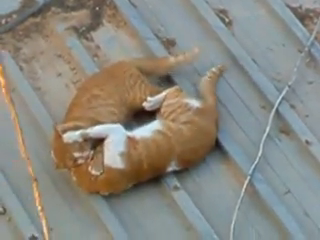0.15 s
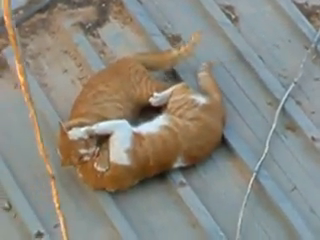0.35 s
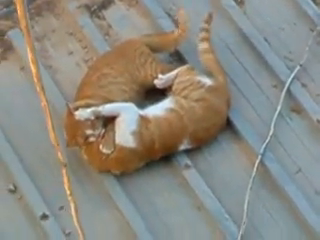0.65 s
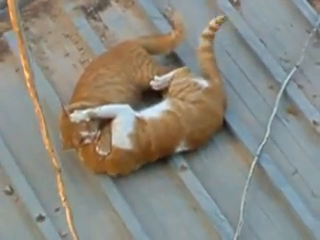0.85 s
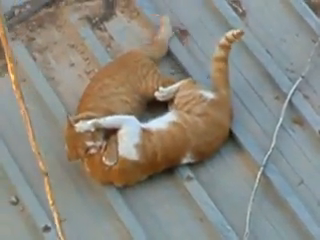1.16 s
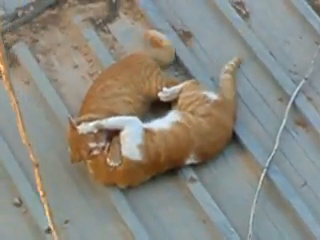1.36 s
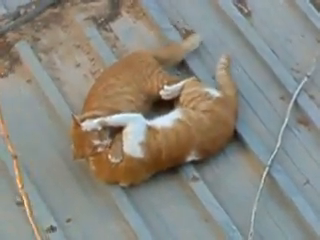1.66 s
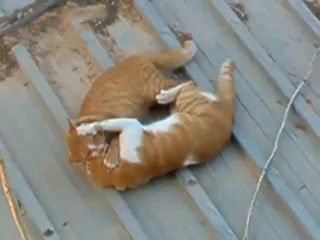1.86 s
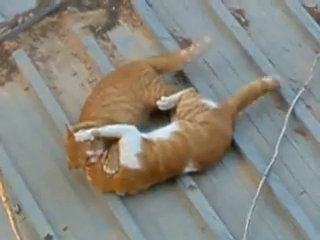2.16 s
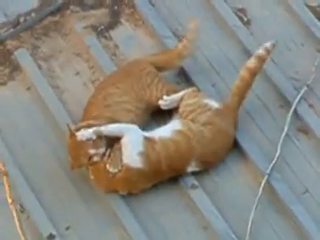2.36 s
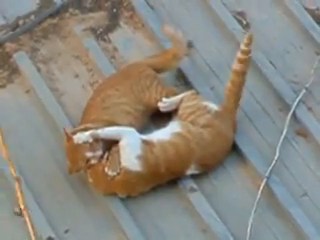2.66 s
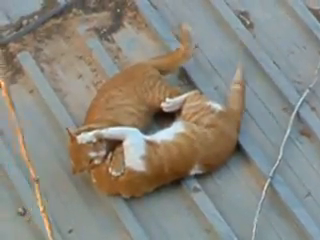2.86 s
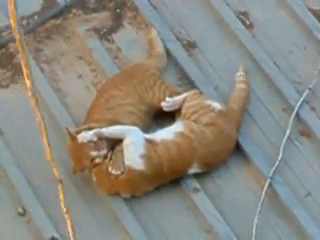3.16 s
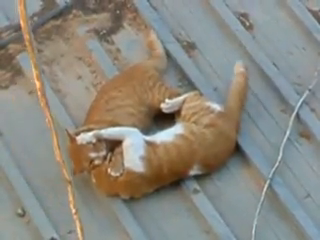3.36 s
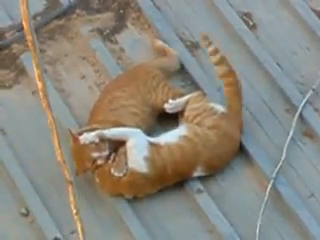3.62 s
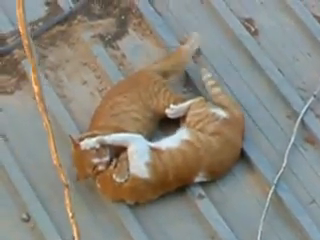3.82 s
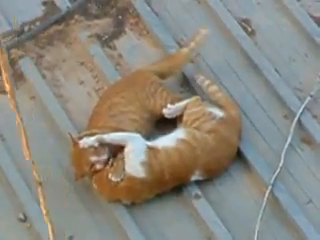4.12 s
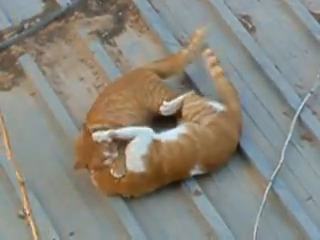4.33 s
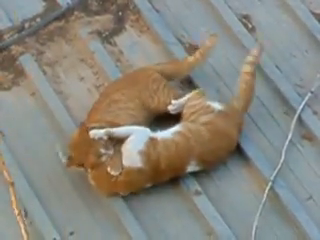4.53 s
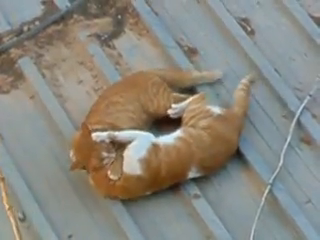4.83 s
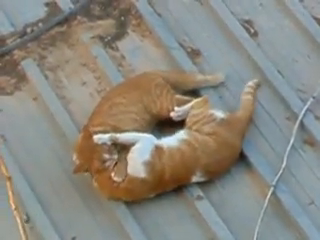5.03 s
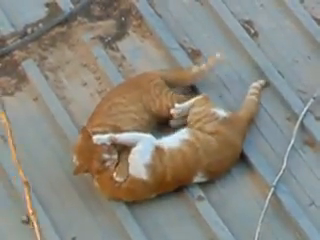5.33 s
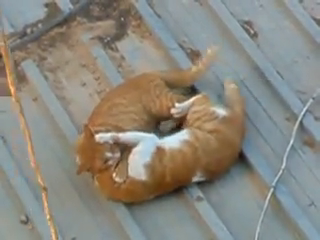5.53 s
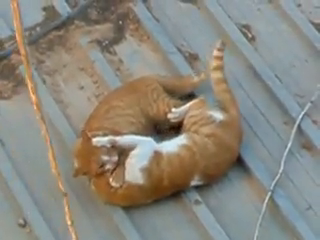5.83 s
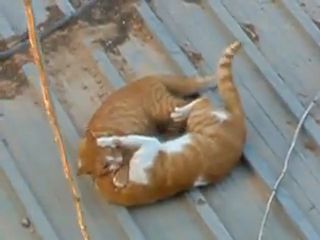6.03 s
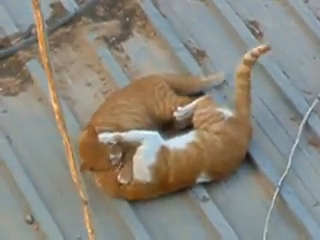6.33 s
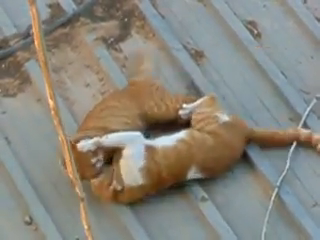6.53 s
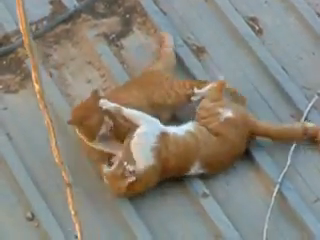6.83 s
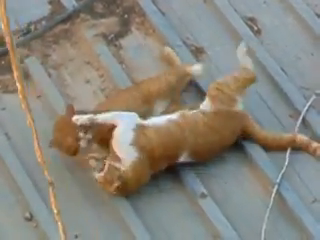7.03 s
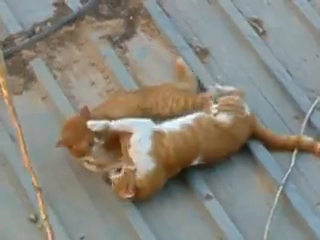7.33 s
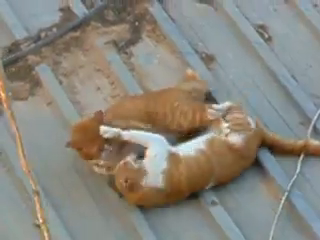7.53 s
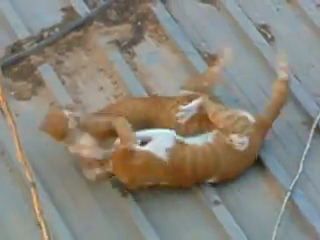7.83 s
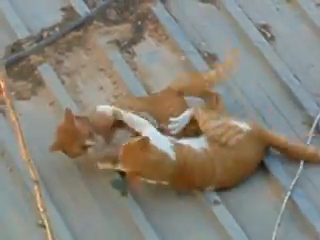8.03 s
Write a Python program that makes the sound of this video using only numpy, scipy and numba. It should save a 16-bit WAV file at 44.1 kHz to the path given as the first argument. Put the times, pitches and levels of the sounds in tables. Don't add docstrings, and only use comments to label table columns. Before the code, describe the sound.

Two fighting cats cry on a ribbed metal roof outdoors. Short wavering yowls rise and fall with pauses between, then one breaks into a harsh, loud scream. Rough growls and snarls follow, ending in a spit and a long piercing shriek that sags into hoarse moaning. Wind thumps the small microphone early on, street noise murmurs behind, and the loudest cries overload.

```python
import sys
import numpy as np
from scipy import signal
from scipy.fft import rfft, irfft, next_fast_len
from scipy.io import wavfile
from scipy.ndimage import uniform_filter1d, minimum_filter1d
from numba import njit

SR = 44100
rng = np.random.default_rng(int(sys.argv[2]) if len(sys.argv) > 2 else 0)


def generate_wav(signal):
    frames = np.transpose(np.atleast_2d(signal))
    scaled = np.clip(frames, -1, 1) * 32767
    pcm = np.round(scaled).astype(np.int16)
    wavfile.write(sys.argv[1], SR, pcm)


def gain_from_decibels(decibels):
    exponent = np.asarray(decibels, float) / 20
    return 10 ** exponent


N = 360738
TIME_S = np.arange(N) / SR
SWITCH_S = 0.03

# time_s, pitch_hz (fold pulses), level_db, mouth_hz (resonance)
TAIL = [(0.0, 420.3, -16, 2060), (0.106, 430, -18.5, 1980), (0.13, 410, -58, 2010)]
ARCH = [(0.44, 262.4, -40, 1690), (0.49, 270.7, -26, 1680), (0.62, 364.7, -22, 1900),
        (0.702, 436, -17.5, 1970), (0.772, 444.6, -19, 1972), (0.912, 426.3, -17.5, 1790),
        (1.0, 365.1, -21.5, 1810), (1.04, 337.7, -31.5, 1825)]
CLIMB = [(1.45, 210.7, -36, 1588), (1.55, 273, -19.5, 1540), (1.64, 447, -14.5, 2130),
         (1.68, 523, -15, 1940)]
WAIL = [(1.685, 359, -15, 2400), (1.705, 371.3, -19, 2180), (1.76, 373.8, -15, 2140),
        (1.855, 376, -14.5, 2050)]
WANE = [(1.865, 360, -14, 2140), (1.893, 354.8, -14.5, 2170), (2.03, 337, -19, 1973)]
SOB = [(2.035, 455.2, -17, 1693), (2.121, 396.6, -23, 1640), (2.17, 333, -36, 1728)]
MOAN = [(2.66, 208.8, -65, 1301), (2.69, 213.8, -37.5, 1297), (2.766, 230.7, -40.5, 1290),
        (2.936, 233.8, -35.5, 1449), (3.112, 240.6, -34.5, 1600)]
YOWL = [(3.12, 251.5, -25, 1480), (3.168, 281.2, -21, 1460), (3.248, 352.6, -18, 1680),
        (3.282, 363.2, -17.5, 1700), (3.48, 356, -17.5, 1707), (3.55, 332, -25.5, 1688)]
WINDUP = [(4.0, 215.5, -63, 1610), (4.032, 226.7, -33, 1475), (4.168, 402, -23, 1730),
          (4.278, 446.8, -18.5, 1749), (4.31, 476.5, -22.5, 1800)]
BREAK = [(4.315, 227.7, -19, 1930), (4.362, 219.3, -9.5, 1930)]
SCREAM = [(4.367, 218.3, -12.5, 2090), (4.4, 210.9, -13, 1950), (4.5, 207.4, -17, 1916),
          (4.555, 213.5, -13.5, 2050), (4.588, 219.7, -13, 2170)]
FADE = [(4.598, 205.6, -9.5, 2200), (4.625, 206.4, -12.5, 2242), (4.65, 210.2, -14, 2273),
        (4.723, 210, -16, 2168), (4.807, 207, -15.5, 1931), (4.883, 193.2, -18, 1943),
        (4.93, 186.6, -21, 1898), (4.97, 161.3, -26, 1873)]
SWELL = [(5.29, 213, -44, 1830), (5.334, 238, -34, 1574), (5.472, 433.3, -25.5, 1830)]
GROWL = [(5.48, 182.2, -21.5, 1953), (5.562, 200.4, -20.5, 2085), (5.67, 205.8, -20.5, 1933),
         (5.804, 191.9, -20.5, 2063), (5.84, 193.5, -20.5, 2100)]
RASP = [(5.845, 262, -19.5, 2039), (5.92, 286, -18, 2060), (6.055, 273.7, -21, 1968),
        (6.13, 236.9, -25, 1903)]
GROAN = [(6.135, 189.2, -27.5, 1797), (6.221, 170.8, -41, 1671)]
SNARL = [(6.226, 172, -30.5, 1690), (6.285, 199.3, -19, 2020), (6.329, 208.7, -19.5, 2020),
         (6.381, 200.7, -23, 2470), (6.43, 189.4, -21.5, 2600), (6.495, 183.3, -20, 2650),
         (6.54, 185.4, -22, 2810)]
SPIT = [(6.545, 190.6, -17, 2504), (6.573, 196.2, -8, 2663), (6.622, 200.2, -15, 2633),
        (6.64, 197.4, -24.5, 2420), (6.74, 199.8, -36, 2196)]
HUFF = [(6.77, 195, -37, 2305), (6.785, 195.7, -33, 2305), (6.81, 199.3, -43, 2323),
        (6.825, 203.7, -30.5, 2350), (6.868, 218, -33, 2350), (6.89, 203.4, -66, 2345)]
SHRIEK = [(7.025, 223, -22.5, 2450), (7.05, 222.7, -10, 2690), (7.144, 198.6, -10.5, 2619),
          (7.266, 219.8, -9, 2554), (7.35, 198.4, -14, 2620), (7.44, 191, -16.5, 2261)]
SAG = [(7.445, 257.7, -17, 2267), (7.53, 263, -16.5, 2209), (7.609, 259.3, -18.5, 2168),
       (7.669, 225.9, -21.5, 1940), (7.688, 229.8, -23, 1950), (7.7, 230, -28, 1865)]
LAST = [(7.705, 222.4, -18, 2050), (7.737, 244.7, -17.5, 2070), (7.823, 235.7, -18, 2190),
        (7.858, 237.3, -20.5, 2100)]


def rms_one(x):
    return x / np.sqrt(np.mean(x ** 2) + 1e-20)


def in_time(rows):
    s, *columns = np.transpose(rows)
    return [np.interp(TIME_S, s, column) for column in columns]


def drift(rate_hz):
    r = np.exp(-2 * np.pi * rate_hz / SR)
    wander = signal.lfilter([1], [1, -2 * r, r * r], rng.standard_normal(N + 8000))
    return rms_one(wander[8000:])


def coloured(spectrum):
    size = next_fast_len(N)
    hz = np.maximum(np.fft.rfftfreq(size, 1 / SR), 1)
    point_hz, point_db = np.transpose(spectrum)
    shape = gain_from_decibels(np.interp(np.log(hz), np.log(point_hz), point_db))
    return rms_one(irfft(rfft(rng.standard_normal(size)) * shape, size)[:N])


@njit
def resonate(x, cosine, r):
    y = np.zeros(len(x))
    for i in range(2, len(x)):
        drive = (1 - r[i] ** 2) / 2 * (x[i] - x[i - 2])
        y[i] = drive + 2 * r[i] * cosine[i] * y[i - 1] - r[i] ** 2 * y[i - 2]
    return y


def cavity(x, hz, width_hz):
    one = np.ones(len(x))
    r = np.exp(-np.pi * 0.6 * width_hz / SR) * one
    for side in (-1, 0, 1):
        centre_hz = hz + 0.37 * side * width_hz
        x = resonate(x, np.cos(2 * np.pi * centre_hz / SR) * one, r)
    power = np.maximum(uniform_filter1d(x * x, size=1300), 0)
    return x / np.sqrt(power + 1e-12)


def street():
    # pitch_hz, level_db (per Hz)
    street_colour = [(150, -29), (250, -14), (473, -6), (1070, -7), (1420, -12), (1560, -9), (1880, -13.5),
                     (2110, -15.5), (2510, -19), (4000, -25.5), (5200, -80), (8800, -120)]
    # time_s, gain_db
    gain_steps = [(0, 3), (2.0, 4), (4.6, 0.5), (4.63, -12), (4.8, -3), (5.0, 1), (5.3, -5), (6.0, 11.5),
                  (7.08, 3), (7.12, -10.5), (7.6, -8.5), (8.18, -8)]
    return coloured(street_colour) * gain_from_decibels(-39.5 + in_time(gain_steps)[0] + 1.5 * drift(4))


def wind():
    # pitch_hz, level_db (per Hz)
    wind_colour = [(12, -53.5), (20, -11), (86, 0), (166, -3.5), (262, -7.5), (414, -13.5), (500, -16.5),
                   (650, -22.5), (1100, -120)]
    # time_s, level_db
    mean_wind = [(0, -34.5), (2.1, -36.5), (4.6, -37.5), (4.625, -52), (5.47, -47.5), (5.56, -39),
                 (7.09, -35.5), (7.12, -60.5), (8.18, -51.5)]
    # time_s, level_db (over the mean), half_length_s
    gusts = [(0.156, 21.5, 0.075), (0.32, 16.5, 0.15), (0.82, 7.5, 0.13), (1.018, 9.5, 0.11),
             (1.242, 7, 0.038), (1.529, 11.5, 0.04), (2.31, 12, 0.064), (2.513, 3, 0.093),
             (3.164, 19.5, 0.12), (3.006, -3.5, 0.24), (3.412, 8, 0.046), (3.565, 10, 0.32),
             (7.001, 4.5, 0.061)]
    # start_s, peak_db, pitch_hz, decay_s (t60; the shaking lasts four times as long)
    buffets = [(0.134, -10.5, 200, 0.011), (0.148, -1, 108, 0.01), (0.175, -5, 186, 0.012),
               (0.306, -0.5, 245, 0.0067), (0.321, -4, 92, 0.012), (0.365, -8, 192, 0.0094),
               (1.241, -27, 132, 0.034), (1.539, -19, 158.3, 0.014), (3.134, -10, 68.45, 0.018),
               (3.428, -18, 88, 0.024), (4.599, -11.5, 167.6, 0.003), (6.97, -21, 84.5, 0.042),
               (7.046, -27, 64.3, 0.015)]
    gust_db = sum(db * np.maximum(1 - abs(TIME_S - s) / half_s, 0) for s, db, half_s in gusts)
    out = coloured(wind_colour) * gain_from_decibels(in_time(mean_wind)[0] + gust_db - 2 + 3.4 * drift(14))
    t = np.arange(SR // 5) / SR
    for s, db, hz, t60 in buffets:
        fade = gain_from_decibels(db - 60 * t / (4 * t60)) * np.minimum(t / 0.0025, 1)
        out[int(s * SR):int(s * SR) + len(t)] += np.sin(2 * np.pi * hz * t) * fade
    return out


def claws():
    # start_s, peak_db, decay_s (t60)
    ticks = [(1.324, -19.5, .07), (5.497, -30, .03), (7.943, -33, .05)]
    out, t = np.zeros(N), np.arange(SR // 10) / SR
    sheet = np.convolve([1, -1.7, 0.76], [1, -0.5])
    for s, db, t60 in ticks:
        burst = np.diff(rng.standard_normal(len(t) + 1)) * gain_from_decibels(db + 4 - 60 * t / t60)
        out[int(s * SR):int(s * SR) + len(t)] += signal.lfilter([0.12], sheet, burst)
    return out


def yard(x):
    wash_db, wash_t60_s = -17, 0.45
    scatter_db, scatter_s = -8, 0.007
    wall_db, wall_s = -26, 0.05
    t = np.arange(int(SR * 0.6)) / SR
    wash = signal.lfilter([1], [1, -0.7], rng.standard_normal(len(t)))
    wash *= gain_from_decibels(-60 * t / wash_t60_s) * (t > 0.015)
    scatter = rng.standard_normal(len(t)) * np.exp(-t / scatter_s) * (t > 0.001)
    answer = (gain_from_decibels(wash_db) * rms_one(wash) + gain_from_decibels(scatter_db) * rms_one(scatter)) / np.sqrt(len(t))
    answer[0] = 1
    answer[int(wall_s * SR)] += gain_from_decibels(wall_db)
    return signal.fftconvolve(x, answer)[:N]


def ribs(x):
    for path_s in (0.0007, 0.0013, 0.0021):
        b = np.zeros(int(path_s * SR) + 1)
        b[0], b[-1] = -0.55, 1
        x = signal.lfilter(b, b[::-1], x)
    return x


def low_cut(x):
    # start_s, end_s
    cuts = [(4.62, 5.3), (7.11, 8.2)]
    switched = sum(1.0 * (TIME_S > a) * (TIME_S < b) for a, b in cuts)
    switched = uniform_filter1d(switched, size=400)
    thin = signal.sosfiltfilt(signal.butter(3, 520, "high", fs=SR, output="sos"), x)
    return x - switched * (x - thin)


def posture():
    # stretch, throat_db, throat_hz, top_db, lips_back (0-1)
    postures = [(TAIL, -11.5, 600, -30.5, 0), (ARCH, -7, 526, -24, 0), (CLIMB, -9.5, 780, -39, 0.077),
                (WAIL, -9.5, 870, -35, 0.024), (WANE, -4.5, 890, -30.5, 0), (SOB, -6, 470, -23.5, 0),
                (MOAN, -2.03, 137, -44, 0), (YOWL, -13, 530, -29.5, 0), (WINDUP, -5, 820, -39, 0.098),
                (BREAK, -6.5, 977, -56, 0.086), (SCREAM, -11.5, 950, -17, .95),
                (FADE, -12.5, 910, -28.5, 0.75), (SWELL, -1.1, 560, -40, .3),
                (GROWL, -8.5, 970, -21.5, 0.34), (RASP, -6.5, 760, -23.5, 0.1), (GROAN, 3.1, 89, -20, 0.18),
                (SNARL, -3, 950, -23.5, 1), (SPIT, -7.5, 1020, -16.5, 1), (HUFF, -35, 620, -2.8, 1),
                (SHRIEK, -29.5, 820, -15, 0.96), (SAG, -27, 790, -16, 0.6), (LAST, -26, 940, -27, 0.58)]
    throat_per_db, top_per_db = 0.17, 0.29
    throat_per_hz, gape_per_db = 2.7, 1.73
    rows, sounding = [], np.zeros(N)
    for stretch, throat_db, throat_hz, top_db, lips in postures:
        s, pitch, level_db, mouth_hz = np.transpose(stretch)
        effort = np.clip(level_db + 20, -30, 15)
        columns = [s, pitch, level_db,
                   throat_db + throat_per_db * effort,
                   top_db + top_per_db * effort,
                   mouth_hz,
                   throat_hz + throat_per_hz * (pitch - pitch.mean()),
                   lips * (4.5 + gape_per_db * effort)]
        rows += list(np.transpose(columns))
        sounding[int(max(s[0] - 0.004, 0) * SR):int((s[-1] + 0.004) * SR)] = 1
    return *in_time(rows), sounding


def manner():
    # start_s, chaos (0-1), mouth_width_hz
    switches = [(0, .6, 1300), (.44, .3, 1400), (.51, .04, 1550), (.88, .42, 1250), (1.0, .3, 1200),
                (1.45, .35, 1500), (1.55, .03, 1500), (1.68, .02, 2300), (1.74, .36, 1600),
                (1.875, .05, 1150), (2.025, .6, 1300), (2.6, .2, 1000), (2.72, .04, 900), (2.95, .05, 1200),
                (3.2, .02, 1000), (3.49, .15, 1100), (4.08, .02, 1300), (4.3, .65, 2000), (4.62, .55, 1900),
                (5.2, .04, 1300), (5.47, .26, 1500), (5.56, .13, 1700), (5.76, .22, 1800),
                (5.83, .42, 2100), (6.15, .35, 850), (6.37, .7, 2300), (6.53, .62, 1100), (6.65, .7, 1700),
                (6.77, .6, 1100), (6.95, .55, 1150), (7.12, .14, 600), (7.3, .27, 950), (7.45, .18, 1100),
                (7.52, .33, 800), (7.66, .5, 800)]
    # start_s, end_s, share
    doubled = [(1.683, 1.74, .95), (7.11, 7.44, .3)]
    s, chaos, width = np.transpose(switches)
    now = np.searchsorted(s, TIME_S, "right") - 1
    glide = int(SWITCH_S * SR)
    extra = sum(share * (TIME_S > a) * (TIME_S < b) for a, b, share in doubled)
    return (uniform_filter1d(chaos[now], size=glide), uniform_filter1d(extra, size=glide // 4),
            uniform_filter1d(width[now], size=glide))


def folds(pitch, chaos, extra):
    waver = 0.003 * drift(25) + chaos * (0.05 * drift(10) + 0.04 * drift(35) + 0.1 * chaos * drift(250))
    turns = np.cumsum(pitch * (1 + waver)) / SR * 2
    nearest = np.round(turns).astype(int)
    paired = np.cos(np.pi * nearest / 2) * drift(11) + np.cos(np.pi * nearest / 3) * drift(7.3)
    uneven_db = np.minimum(chaos, 0.45) * (5 * paired + 3 * rng.standard_normal(N)[nearest])
    size = gain_from_decibels(uneven_db) * np.where(nearest % 2, extra, 1)
    fall, cosine = np.exp(-2 * pitch / 6000), np.cos(2 * np.pi * turns)
    pulses = (1 - fall ** 2) / (1 - 2 * fall * cosine + fall ** 2)
    pulses -= (1 - fall) / (1 + fall)
    open_share = 0.5 + 0.5 * np.cos(np.pi * turns)
    breath = np.diff(rng.standard_normal(N + 1)) * (3.55 + open_share)
    return pulses * size, 4.5 * (chaos + 0.04 + chaos ** 3) * breath


def nose(x, chaos):
    # pitch_hz, width_hz, share (taken out)
    side_cavities = [(990, 610, 0.68), (3100, 78, 0.1), (930, 79, 0.45)]
    for hz, width_hz, share in side_cavities:
        x = x - share * (1 - chaos) * signal.lfilter(*signal.iirpeak(hz, hz / width_hz, fs=SR), x)
    return x


def locked(source, pitch):
    # start_s, end_s, multiple (of the pulse rate), level_db
    locks = [(.6, .95, 3, -9), (.7, .92, 6, -15), (1.7, 1.87, 4, -4), (1.705, 1.77, 8, -7),
             (1.87, 2.0, 5, -7), (1.74, 1.87, 5, -7), (2.7, 3.1, 2, -3), (2.72, 3.1, 5, -1),
             (3.2, 3.55, 7, -13), (3.22, 3.52, 8, -19), (3.2, 3.55, 10, -32), (4.32, 4.45, 11, -8),
             (4.53, 4.58, 13.5, -9), (4.6, 4.7, 12.5, -6), (4.6, 4.8, 7.7, -8), (4.7, 4.82, 9.3, -9),
             (4.37, 4.58, 3, -13), (4.41, 4.58, 5, -13), (4.62, 4.97, 3, -23), (4.62, 4.8, 5, -21),
             (4.86, 4.97, 4, -12), (5.53, 5.86, 3, -11), (5.49, 5.87, 4, -9), (5.56, 5.84, 7, -12),
             (5.56, 5.86, 10, -11), (5.53, 5.84, 12, -7), (5.85, 6.07, 2, -16), (5.85, 6.15, 3, -10),
             (5.5, 5.62, 15, -11), (5.57, 5.78, 16, -17), (5.57, 5.75, 19, -28), (7.12, 7.27, 14, -14),
             (7.13, 7.4, 12, -7)]
    out, glide = np.zeros(N), int(SWITCH_S * SR)
    for a, b, multiple, db in locks:
        span = slice(int(a * SR) - glide, int(b * SR) + glide)
        count = np.arange(span.stop - span.start)
        fade = np.minimum(np.minimum(count, count[::-1]) / (2 * glide), 1)
        out[span] += gain_from_decibels(db) * fade * cavity(source[span], multiple * pitch[span], 244)
    return out


def cats():
    # time_s, top_hz, top_db, shoulder_db
    tongue = [(0, 5740, 1.5, 8), (.75, 5800, -3, 1.5), (.86, 5860, -1, 4), (.93, 5433, -1.5, 0),
              (1.6, 5900, 7, -7.5), (1.8, 6273, 2, -18.5), (2.0, 5860, -6, 2), (2.08, 5574, -3, 0),
              (3.3, 5773, -2.5, -4), (4.3, 5995, 9, -15), (4.4, 5927, -1, 8), (4.48, 5965, 4, 14),
              (4.58, 5930, 0, 7.5), (4.68, 6122, 14, -20), (4.94, 5840, -8, -21), (5.55, 6170, 1, 7),
              (5.82, 6087, -1.5, 7), (5.92, 6210, 2.5, -14), (6.14, 6100, -1.5, -11), (6.33, 5846, 4.5, -9),
              (6.4, 5770, 14.5, 3), (6.45, 5500, -27, -17), (6.52, 5390, 4, 12), (6.58, 5590, -11.5, 8),
              (6.68, 5594, 7.5, 14.5), (6.71, 5700, 14, 14), (6.76, 5500, 6.5, 3), (6.8, 5680, -12, 3),
              (6.822, 5730, -3, 9), (6.87, 5950, -2, 11), (7.05, 5512, -10, 1.5), (7.15, 5607, 3.5, 11),
              (7.25, 5850, -5.5, 5), (7.37, 6110, -3, 7.5), (7.49, 5855, 3, 5), (7.545, 5670, -10, 3.5),
              (7.58, 5803, 3.5, 6), (7.66, 6037, -12, -5), (7.71, 5800, -1, -3), (7.74, 5700, 1.5, 9),
              (7.81, 5700, -5, 1), (7.87, 5824, -3, -11)]
    pitch, level_db, throat_db, top_db, mouth_hz, throat_hz, gape, sounding = posture()
    chaos, extra, width = manner()
    top_hz, top_shade_db, shoulder_db = in_time(tongue)
    pulses, breath = folds(pitch, chaos, extra)
    source = pulses + breath
    steadier = sum(folds(pitch, 0.75 * chaos ** 1.2, extra))
    rumble = 6 * chaos ** 2 * rng.standard_normal(N)
    gape = np.clip(gape, 0, 1)
    top_hz = top_hz + 70 * drift(6)
    flicker = [gain_from_decibels(4 * chaos * drift(18)) for _ in range(4)]

    calm = signal.sosfilt(signal.butter(12, 2854, fs=SR, output="sos"), source)
    through_lips = calm + gape ** 1.4 * (source - calm)
    jaw_hz = mouth_hz - 0.13 * width + 250 * chaos ** 2 * drift(9)
    voice = flicker[0] ** 0.5 * cavity(through_lips, jaw_hz, width)

    throat = cavity(steadier + rumble, 0.94 * throat_hz, 690 * (1 + 0.93 * chaos))
    voice += gain_from_decibels(throat_db) * flicker[1] * throat

    shoulder = cavity(pulses + np.minimum(11 * chaos, 2.5) * breath, 3548.5, 1699.5)
    voice += gain_from_decibels(-32.5 + 9.5 * gape + shoulder_db) * flicker[2] * shoulder

    top_width_hz = 1060 * (1 + chaos) * (1 - 0.31 * gape)
    top = cavity(pulses + np.minimum(4 * chaos, 1) * breath, top_hz, top_width_hz)
    voice += gain_from_decibels(top_db + top_shade_db) * flicker[3] * top

    chest = np.sin(2 * np.pi * np.cumsum(pitch) / SR) * np.clip(pitch / 100 - 3.1, 0, 1)
    voice += gain_from_decibels(-43 - level_db) * chest * (1 - chaos) ** 2 * (level_db > -30)

    valley_r = np.exp(-np.pi * 1300 / SR) * np.ones(N)
    valley = resonate(voice, np.cos(2 * np.pi * (top_hz - 1000) / SR), valley_r)
    voice = nose(voice - 0.5 * valley, chaos)
    voice += flicker[1] * locked(steadier + 1.5 * rumble, pitch)
    return voice * gain_from_decibels(level_db) * uniform_filter1d(sounding, size=300)


def scene():
    roof = ribs(cats()) + claws()
    return (low_cut(yard(roof)) + wind() + street())[None]


def starved(x):
    from_hz, all_hz, loud_db = 6800, 10000, -34
    hz, _, z = signal.stft(x[0], SR, nperseg=1024)
    power_db = 10 * np.log10(np.sum(abs(z) ** 2, axis=0) + 1e-12)
    loud = np.clip((power_db - loud_db) / 20, 0.12, 1)
    height = np.clip((hz[:, None] - from_hz) / (all_hz - from_hz), 0.01, 1)
    odds = height * (hz[:, None] > 4000) * loud
    draws = rng.random((len(hz) // 3 + 1, z.shape[1] // 8 + 1))
    draws = np.kron(draws, np.ones((3, 8)))[:len(hz), :z.shape[1]]
    return signal.istft(z * (draws > odds), SR, nperseg=1024)[1][None, :N]


def late_limiter(x):
    # time_s, peak_db (over full scale)
    overloads = [(4.385, .5), (4.602, 3.5), (6.585, 1.9), (7.06, 1.0), (7.097, 1.0)]
    gain = np.ones(N)
    for s, db in overloads:
        bump = np.exp(-((TIME_S - s) / 0.003) ** 2)
        gain += (gain_from_decibels(db) / np.max(abs(x) * (bump > 0.8)) - 1) * bump
    return x * gain


def band_limit(x):
    return signal.sosfilt(signal.butter(12, 15700, fs=SR, output="sos"), x)


def record(dry):
    # pitch_hz, level_db (per Hz)
    hiss_colour = [(880, -54.5), (1500, -2.5), (2040, -0.5), (2440, -2), (2940, -9.5), (3920, -11),
                   (6810, -13), (8330, -20), (10800, -34), (18300, -120)]
    whine = gain_from_decibels(-64 + 4 * drift(8)) * np.sin(2 * np.pi * 3513 * TIME_S)
    x = dry + gain_from_decibels(-44) * coloured(hiss_colour) + whine
    x = signal.sosfilt(signal.cheby2(8, 23, 8900, fs=SR, output="sos"), x)
    x = signal.sosfilt(signal.butter(10, 10000, fs=SR, output="sos"), x)
    held = minimum_filter1d(0.93 / np.maximum(abs(x), 0.93), size=301)
    x = starved(x * uniform_filter1d(held, size=300))
    return band_limit(np.clip(late_limiter(x) + 0.0038, -1, 1))


dry = scene()
out = record(dry)
generate_wav(out)
```